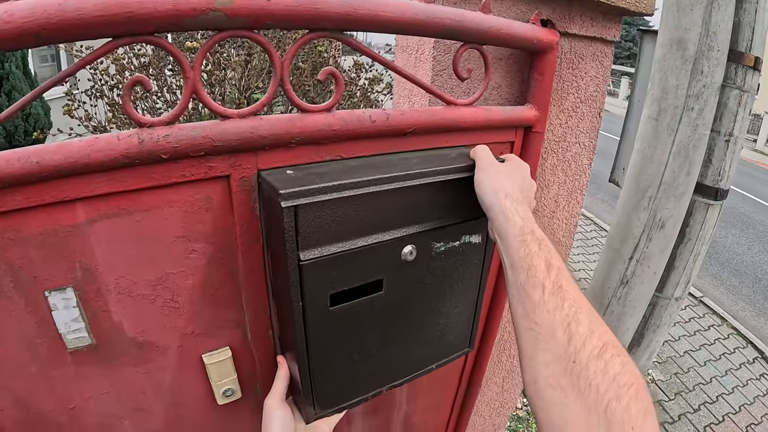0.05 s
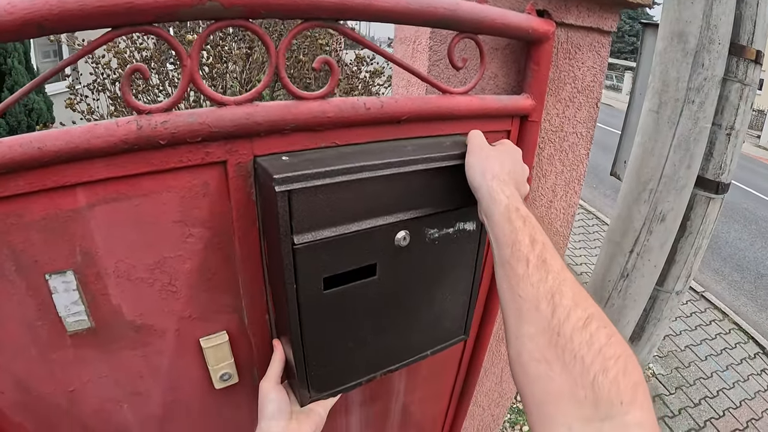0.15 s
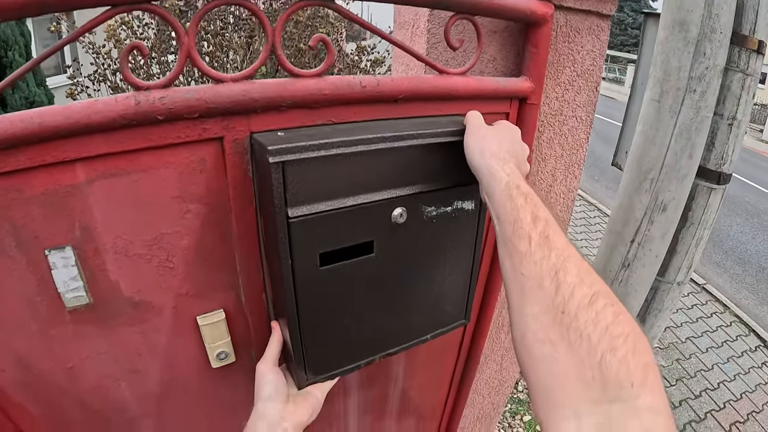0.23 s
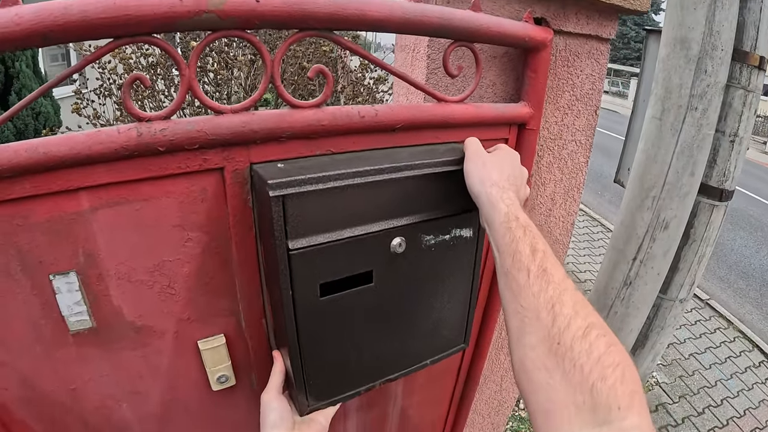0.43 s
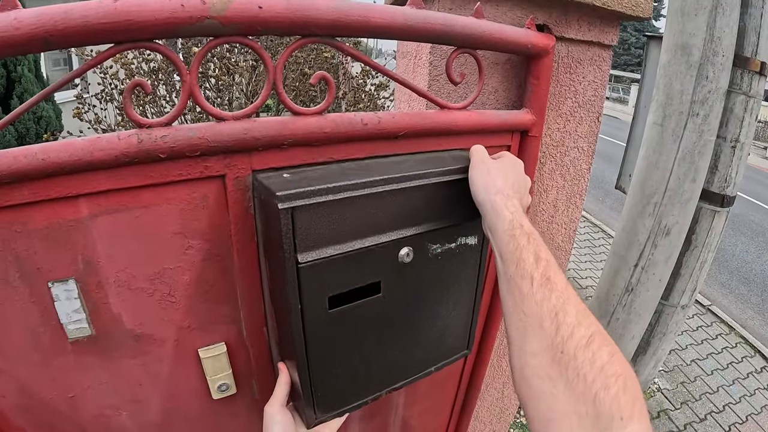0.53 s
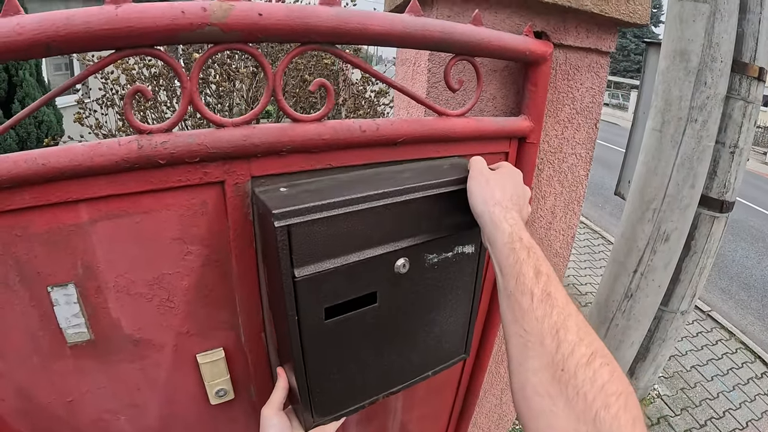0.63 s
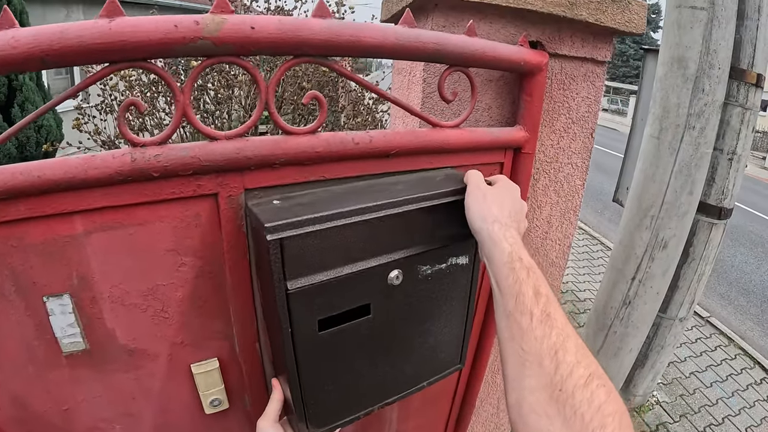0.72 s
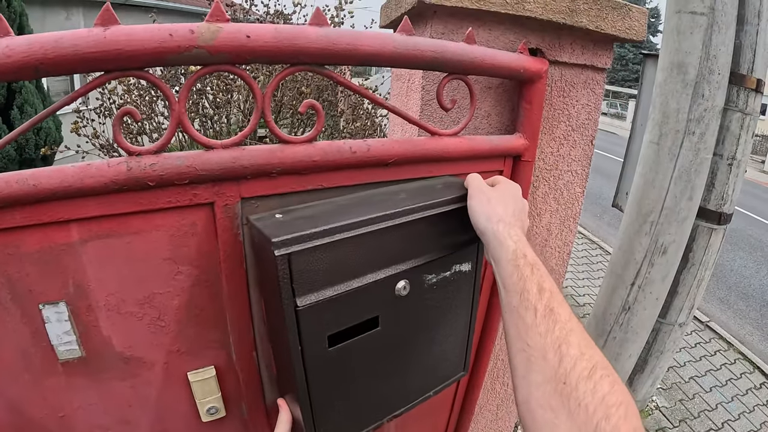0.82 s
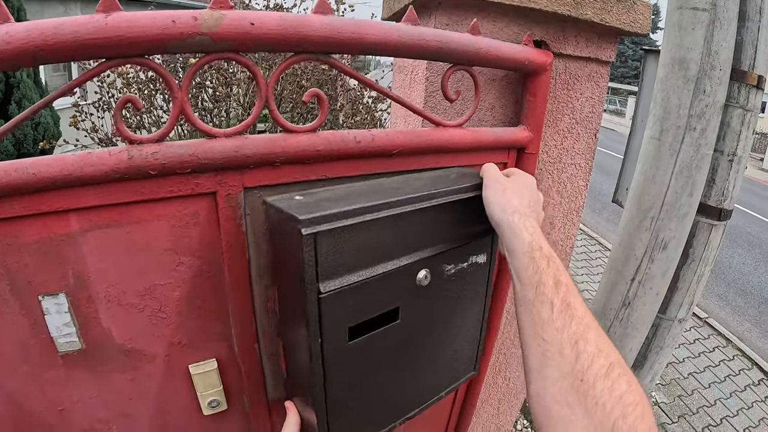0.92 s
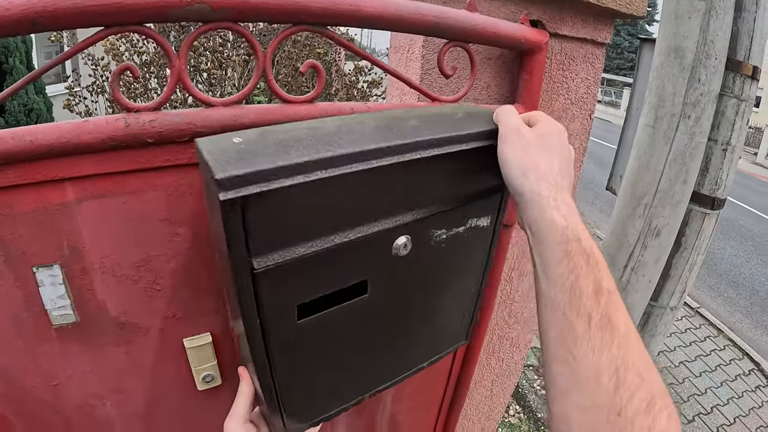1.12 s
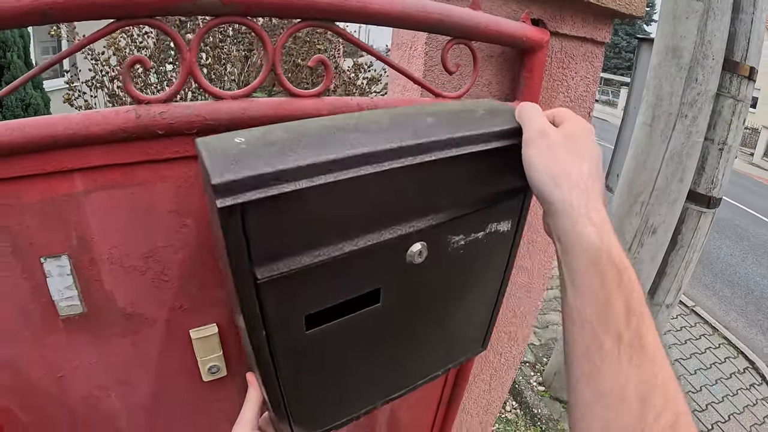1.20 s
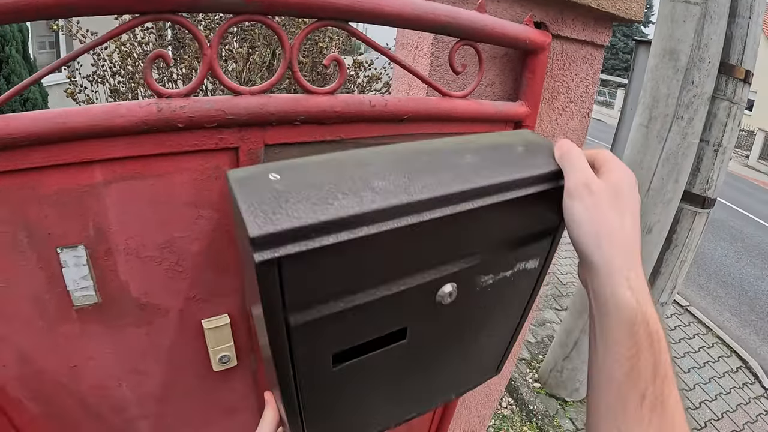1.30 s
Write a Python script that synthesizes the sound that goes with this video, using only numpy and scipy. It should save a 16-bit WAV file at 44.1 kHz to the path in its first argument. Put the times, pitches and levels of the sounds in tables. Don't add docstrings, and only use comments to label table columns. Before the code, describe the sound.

Metal mailbox tugged on a metal gate: hollow bangs, bright clacks and gritty scraping outdoors.

```python
import sys
import numpy as np
from scipy import signal
from scipy.fft import rfft, irfft
from scipy.io import wavfile

SR = 44100
rng = np.random.default_rng(int(sys.argv[2]) if len(sys.argv) > 2 else 0)


def invert_db(x):
    u = np.asarray(x, float) / 20
    return 10 ** u


def pcm_store(signal):
    levels = np.round(np.clip(np.atleast_2d(signal), -1, 1) * 32767)
    wavfile.write(sys.argv[1], SR, levels.astype(np.int16).T)


N = 59535

CLACK_RISE_S, THUMP_RISE_S, BOOM_RISE_S = 0.00054, 0.0017, 0.0032
BODY_SPREAD_DB = 2.0


def at_hz(points, hz):
    table_hz, value = np.transpose(points)
    return np.interp(np.log(hz), np.log(table_hz), value)


def rms_one(x):
    return x / np.sqrt(np.mean(x ** 2) + 1e-20)


# pitch_hz, level_db
WIDTH = [(60, -24), (300, -22.5), (1000, -12.5), (2500, -7.5), (8000, -13.5), (14000, -2.5)]


def strike(times, hz, gains, fade, t60s, rise_s, spread_db):
    ring_s = 0.45
    t = np.arange(int(ring_s * SR)) / SR
    modes = np.sin(2 * np.pi * np.outer(hz, t)) * invert_db(-60 * np.outer(fade, t))
    luck = rng.standard_normal((len(times), 3, len(hz)))
    mid_gains = gains * invert_db(spread_db * luck[:, 0]) * np.sign(luck[:, 1])
    side_gains = gains * luck[:, 2] * invert_db(at_hz(WIDTH, hz))
    end_fade = np.clip((ring_s - t) * 20, 0, 1)
    out = np.zeros((2, N + len(t)))
    for start_s, mid, side, t60 in zip(times, mid_gains @ modes, side_gains @ modes, t60s):
        decay = invert_db(-60 * t / np.clip(t60, .02, 3))
        shape = (1 - np.exp(-t / rise_s)) * decay * end_fade
        start = int(start_s * SR)
        out[:, start:start + len(t)] += np.array([mid + side, mid - side]) * shape
    return out[:, :N]


def soft_contacts(events, modes, level_db, centre_hz, focus_db, rise_s, count):
    start_s, db, tilt, t60 = np.transpose(events)
    hz, mode_db = np.transpose(modes)
    filler_hz = np.geomspace(.6 * hz.min(), 1.3 * hz.max(), count) * rng.uniform(.98, 1.02, count)
    filler_db = -12.5 - 6 * (filler_hz < .75 * centre_hz)
    hz, mode_db = np.r_[hz, filler_hz], np.r_[mode_db, filler_db]
    octaves = np.log2(hz / centre_hz)
    hit_db = db[:, None] + tilt[:, None] * octaves
    gains = invert_db(level_db + mode_db + hit_db - focus_db * np.abs(octaves))
    return strike(start_s, hz, gains, hz / 400, t60, rise_s, BODY_SPREAD_DB)


# start_s, level_db, tilt_db_per_octave, t60_s
THUMPS = [(0.173, -22.5, 3, 1), (0.228, -10, 2, 0.18), (0.236, -7, -2, 0.16), (0.277, -22, 10, 0.86),
          (0.306, -15, 6.5, 0.095), (0.349, -22.5, 1.5, 0.67), (0.414, -26, 5, 0.37),
          (0.45, -28.5, 6.5, 0.99), (0.576, -4, 4, 0.089), (0.583, -5.5, 1, 0.21), (0.596, -3.5, -7, 0.23),
          (0.612, -4.5, 5, 0.15), (0.622, -5, 3, 0.081), (0.639, -10, 5.5, 0.2), (0.674, -12.5, 6.5, 0.28),
          (0.709, -21, 8.5, 1), (0.795, -19, 9, 0.92), (0.901, -8.5, -0.5, 0.2), (0.907, -5.5, -6.5, 0.16),
          (0.922, -6.5, 3, 0.18), (0.968, -14, 4, 0.29), (1.003, -21, 5.5, 1), (1.059, -25, 3, 1),
          (1.151, -28.5, -1, 0.66), (1.248, -39, -24, 0.51)]
# pitch_hz, level_db
BOX = [(205, -4), (236, -7), (265, -4), (283, 2), (332, 1), (361, -2), (392, -9), (421, -10), (460, -7),
       (670, -5), (867, -12), (960, -12), (530, -15)]


def thumps():
    return soft_contacts(THUMPS, BOX, level_db=-9.5, centre_hz=320, focus_db=8.5,
                         rise_s=THUMP_RISE_S, count=50)


# start_s, level_db, tilt_db_per_octave, t60_s
BOOMS = [(.226, -9.5, -9, 1), (.275, -4.5, -2, 0.18), (.31, -13.5, 10, 1), (.576, -16.5, 32.5, 0.46),
         (.70, -21.5, 24.5, 0.37), (.74, -20, -19, 0.2), (.905, -13, 15.5, 0.86), (.98, -14.5, -13.5, 0.78),
         (1.09, -13, -1, 0.71), (1.16, -23, -14, 0.65), (1.24, -17, -9, 0.56)]
# pitch_hz, level_db
PANEL = [(63, -4), (93, -2), (124, -4.5), (146, -4.5)]


def booms():
    return soft_contacts(BOOMS, PANEL, level_db=-4.5, centre_hz=100, focus_db=15.5,
                         rise_s=BOOM_RISE_S, count=8)


# pitch_hz, level_db (per Hz)
SHEET = [(700, -14), (1200, -6), (1700, -15.5), (3500, -11.5), (6500, -12), (8000, -15), (12000, -23.5),
         (15000, -43)]
# pitch_hz, t60_s
SHEET_T60 = [(700, 1), (2000, 0.82), (5000, 0.16), (10000, 0.17), (15000, 0.061)]
STRONG_HZ = [1442, 2606, 2713, 3030, 3386, 3618, 3838, 4199, 4440, 5615, 5884, 6794, 7768]


def sheet_modes(count, low_hz, high_hz):
    strong_db, strong_rings_longer, spread_db = 4, 1.3, 3.0
    place = (np.arange(count) + rng.random(count)) / count
    dense_hz = (np.sqrt(low_hz) + place * (np.sqrt(high_hz) - np.sqrt(low_hz))) ** 2
    hz = np.r_[dense_hz, STRONG_HZ]
    db = np.r_[spread_db * rng.standard_normal(count), np.full(len(STRONG_HZ), strong_db)]
    gain = invert_db(at_hz(SHEET, hz) + db) * hz ** .25
    fade = rng.uniform(.7, 1.3, len(hz)) / at_hz(SHEET_T60, hz)
    fade = fade / np.where(np.isin(hz, STRONG_HZ), strong_rings_longer, 1)
    return hz, gain / np.sqrt(np.sum(gain[hz > 2500] ** 2) / 2), fade


# start_s, level_db, tilt_db_per_octave, t60_s
CLACKS = [(0.176, -20.5, 0.5, 0.49), (0.2115, -26, -5, 0.44), (0.2453, -19.5, -4, 0.062),
          (0.2564, -17, -1, 0.13), (0.3039, -16, -3.5, 0.3), (0.3474, -32, -3.5, 0.27),
          (0.3942, -42, -12.5, 0.18), (0.407, -38.5, -8, 0.088), (0.424, -45, -11.5, 0.45),
          (0.454, -50, 10.5, 0.04), (0.473, -43, 8, 0.053), (0.506, -44, 5, 0.2),
          (0.5739, -29.5, -10, 0.67), (0.5882, -15.5, -1, 0.27), (0.6148, -39, 9, 0.45),
          (0.6566, -22.5, -3.5, 0.18), (0.6983, -34.5, -10, 0.41), (0.712, -10, 2, 0.15),
          (0.7777, -20.5, -4, 0.081), (0.8087, -24.5, -3, 0.35), (0.8645, -22.5, -0.5, 0.25),
          (0.9021, -27, -15.5, 0.092), (0.9146, -12, -2, 0.18), (0.972, -29.5, -7, 0.2),
          (1.034, -39, -8.5, 0.5), (1.1095, -32.5, -1.5, 0.17), (1.1512, -40, -6, 0.13),
          (1.184, -31, 0.5, 0.16)]


def clacks():
    firm_db, dull_hz = -23, 7000
    light_dulls = 0.72
    start_s, db, tilt, t60 = np.transpose(CLACKS)
    hz, gain, fade = sheet_modes(count=400, low_hz=699.8, high_hz=15616)
    tilt_db = tilt[:, None] * np.log2(np.maximum(hz, 1800) / 5000)
    under_firm_db = np.minimum(db[:, None] - firm_db, 0)
    dull_db = light_dulls * under_firm_db * np.log2(np.maximum(hz / dull_hz, 1))
    gains = gain * invert_db(-10.5 + db[:, None] + tilt_db + dull_db)
    return strike(start_s, hz, gains, fade, t60, CLACK_RISE_S, spread_db=4.0)


# start_s, pitch_hz, bend_hz (upward as the grip closes)
RING_AT = [(.31, 5884, 0), (.31, 5927, 0), (1.062, 5880, 0), (1.151, 4410, 0), (.714, 1126, 30),
           (.212, 1134, 0), (.247, 1134, 0), (.256, 3030, 0), (.304, 1110, 0), (.326, 1134, 28),
           (.305, 2713, 0), (.574, 680, 0), (.612, 664, 0), (.712, 3820, 0), (.712, 4990, 0),
           (.714, 2606, 0), (.715, 9351, 0), (.715, 9496, 0), (.715, 9830, 0), (.776, 2715, 0),
           (.915, 9700, 0), (.92, 3150, 0), (.3, 680, 0), (.904, 690, 0), (.97, 675, 20), (.415, 210, 0),
           (.995, 200, 0), (.178, 3500, 0), (.178, 4300, 0), (.905, 334, 0), (.606, 281, 0), (.235, 93, 0),
           (1.03, 96, 0), (.28, 5400, 0), (.28, 4420, 0), (1.075, 3080, 0)]
# level_db, t60_s, held_s (time until a hand damps it)
RING_SIZE = [(-50, .7, .15), (-53, .7, .15), (-59, 3.0, .048), (-51, .3, .032), (-26.5, 3.0, .122),
             (-28, 1, .027), (-29, .8, .048), (-40.5, .8, .23), (-23, .2, .02), (-30.5, 3, .04),
             (-36, .2, .06), (-23, .3, .03), (-21.5, .6, .045), (-26, .1, .03), (-26, .1, .03),
             (-42, .8, .12), (-42, .3, .07), (-41, .3, .07), (-44, .2, .07), (-30, .25, .02),
             (-43, .15, .045), (-48, 1.2, .3), (-30, .5, .04), (-27, .4, .035), (-32, .5, .025),
             (-30, .3, .08), (-32, .6, .1), (-35, .2, .04), (-34, .15, .03), (-14, .4, .032),
             (-13, .6, .045), (-22, .6, .2), (-24, .8, .2), (-40, .3, .025), (-40, .3, .025),
             (-57, 1, .035)]


def rings():
    waver_db, waver_hz, waver_per_s = 1.2, 1.5, 40
    bend_s, damped_t60_s, rise_cycles = .025, .028, 0.81
    t, out = np.arange(N) / SR, np.zeros(N)
    for (start_s, hz, bend_hz), (db, t60, held_s) in zip(RING_AT, RING_SIZE):
        age = np.maximum(t - start_s, 0)
        grip = rng.standard_normal((2, 60))
        level, pitch = [np.interp(age * waver_per_s, np.arange(60), row) for row in grip]
        bend = bend_hz * np.clip((age - held_s) / bend_s + 1, 0, 2) ** 2
        shift_hz = (waver_hz * pitch + bend) * (age > 0)
        phase = 2 * np.pi * (hz * age + np.cumsum(shift_hz) / SR)
        damped_db = 60 * np.maximum(age - held_s, 0) / damped_t60_s
        loudness = invert_db(db + waver_db * level - 60 * age / t60 - damped_db)
        out += loudness * np.sin(phase) * (1 - np.exp(-age * hz / rise_cycles))
    return out


# start_s, level_db
SCRAPE = [(0.156, -62.5), (0.183, -38.5), (.24, -42), (.35, -45), (.40, -70), (0.498, -52), (0.566, -47),
          (0.602, -29), (0.673, -40), (0.702, -34), (.83, -43), (.89, -51), (0.924, -29.5), (0.992, -37.5),
          (1.02, -46.5), (1.07, -57), (1.2, -57.5), (1.35, -73)]


def scrape():
    grit_per_s, grit_spread_db = 2500, 3.0
    sizzle_hz, sizzle_follows = 6000, 0.67
    drag_s, drag_db = np.transpose(SCRAPE)
    db = np.interp(np.arange(N) / SR, drag_s, drag_db)
    grit = (rng.random(N) < grit_per_s / SR) * rng.choice([-1, 1], N)
    grit = grit * invert_db(grit_spread_db * np.minimum(rng.exponential(1, N), 4))
    hz, gain, fade = sheet_modes(count=400, low_hz=679.7, high_hz=15500)
    sheet = strike([0], hz, gain[None], fade, [0.11], CLACK_RISE_S, BODY_SPREAD_DB)
    box = soft_contacts([(0.0019, 0, 0, 0.25)], BOX[:9], level_db=0, centre_hz=510, focus_db=0.96,
                        rise_s=THUMP_RISE_S, count=30)
    body = invert_db(3.5) * rms_one(sheet) + invert_db(6.5) * rms_one(box)
    drive = grit * invert_db(db) / np.sqrt(N * np.mean(grit ** 2))
    full = signal.fftconvolve(body, drive[None], axes=1)[:, :N]
    dull = signal.sosfiltfilt(signal.butter(2, sizzle_hz, fs=SR, output="sos"), full)
    return dull + (full - dull) * invert_db(sizzle_follows * (db - db.max()))


# pitch_hz, level_db
STREET = [(15, -33), (25, 12), (134, 2), (183, -5.5), (330, -19), (631, -23.5), (1730, -31), (4160, -47.5),
          (12000, -60.5), (15600, -104), (22000, -120)]


def street():
    hz = np.maximum(np.fft.rfftfreq(N, 1 / SR), 10)
    noise = rfft(rng.standard_normal((2, N)))
    mid, side = rms_one(irfft(noise * invert_db(at_hz(STREET, hz)), N))
    side = side * invert_db(-17.5)
    return invert_db(-32) * np.array([mid + side, mid - side])


def scene():
    return thumps() + booms() + clacks() + rings() + scrape() + street()


def roll_off(x):
    return signal.sosfilt(signal.butter(12, 15830, fs=SR, output="sos"), x)


# pitch_hz, level_db
BALANCE_DB = [(60, -0.5), (3000, -1.5), (8000, -0.4), (14000, 3)]


def record(dry):
    edge_fade_s, pad = .004, 2000
    lag_s, lag_fades_hz = 1 / SR, 6000
    x = signal.sosfilt(signal.butter(1, 72, "high", fs=SR, output="sos"), dry)
    to_edge = np.minimum(np.arange(N), np.arange(N)[::-1])
    x = x * np.clip(to_edge / SR / edge_fade_s, 0, 1)
    x = np.pad(x, [(0, 0), (pad, pad)], mode="reflect")
    hz = np.maximum(np.fft.rfftfreq(x.shape[1], 1 / SR), 1)
    lag = np.exp(-1j * np.pi * hz * lag_s / (1 + (hz / lag_fades_hz) ** 2))
    half = invert_db(at_hz(BALANCE_DB, hz) / 2) * lag
    mix = irfft(rfft(x) * np.array([half, 1 / half]), x.shape[1])[:, pad:-pad]
    return roll_off(mix)


dry = scene()
out = record(dry)
pcm_store(out)
```